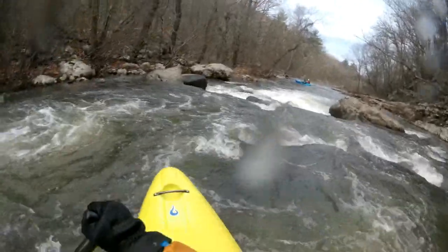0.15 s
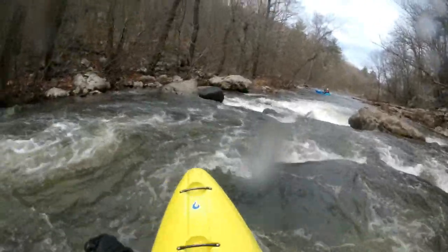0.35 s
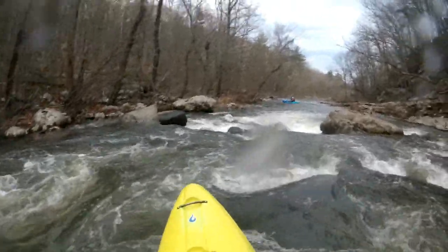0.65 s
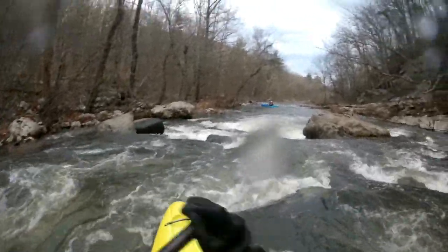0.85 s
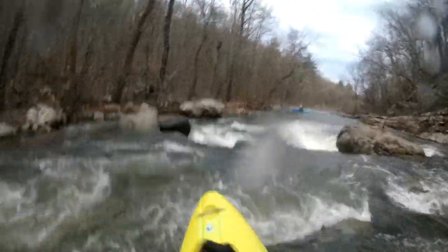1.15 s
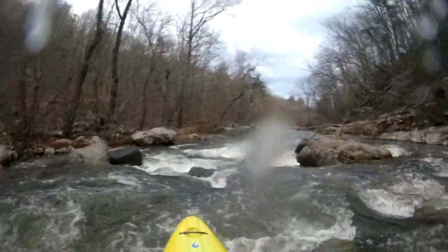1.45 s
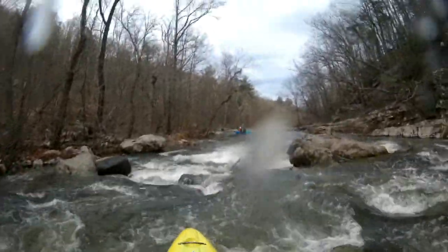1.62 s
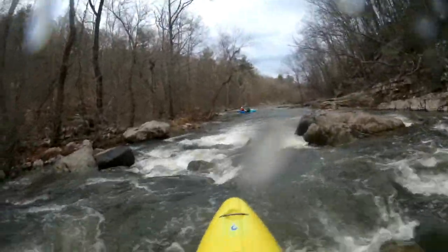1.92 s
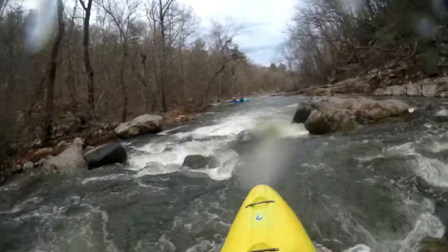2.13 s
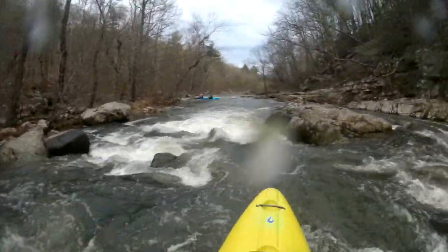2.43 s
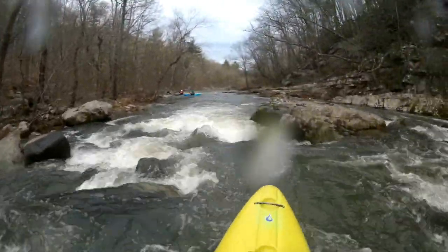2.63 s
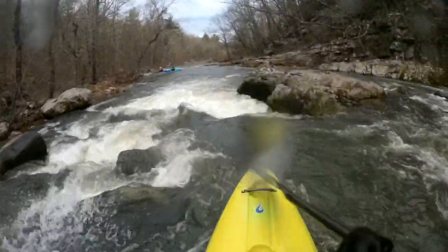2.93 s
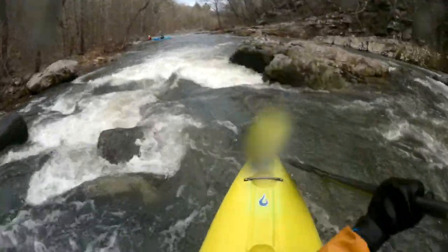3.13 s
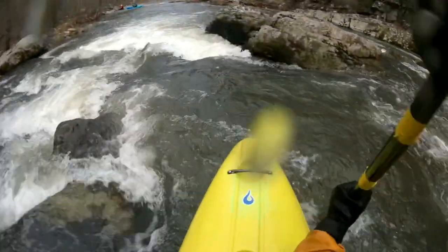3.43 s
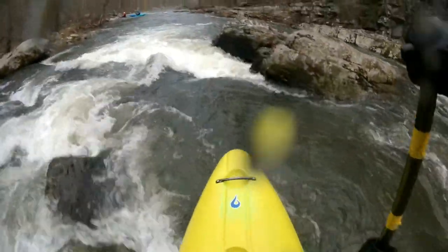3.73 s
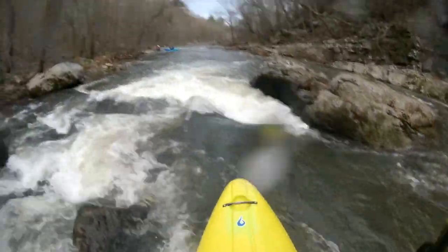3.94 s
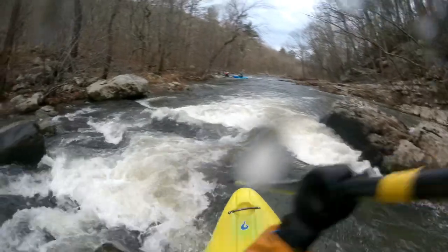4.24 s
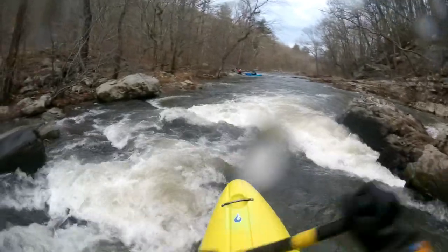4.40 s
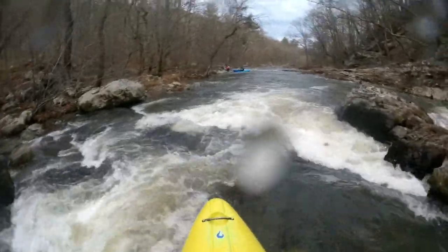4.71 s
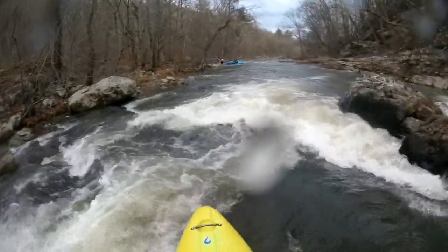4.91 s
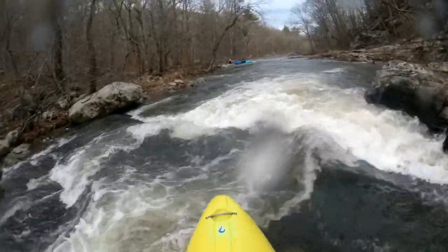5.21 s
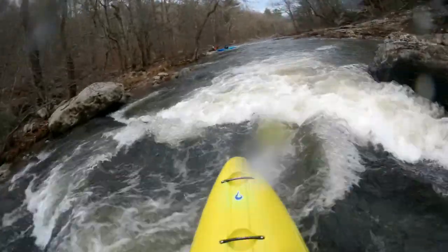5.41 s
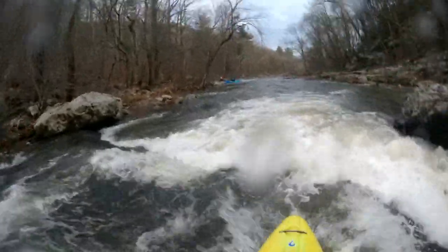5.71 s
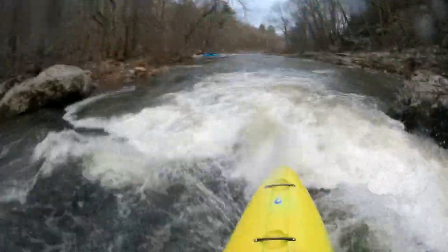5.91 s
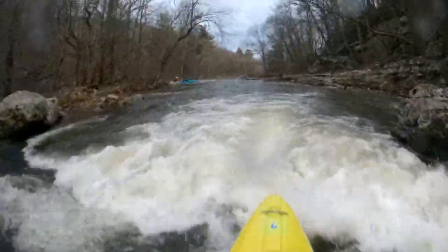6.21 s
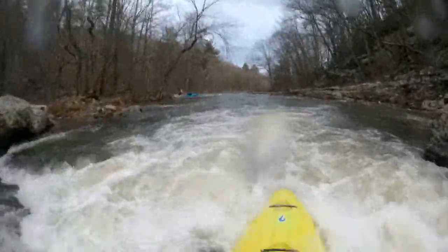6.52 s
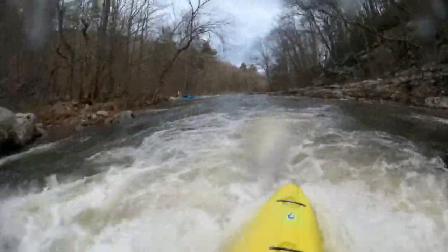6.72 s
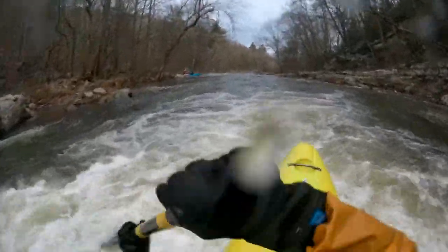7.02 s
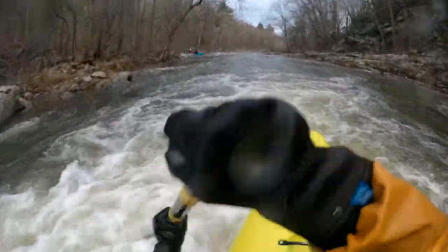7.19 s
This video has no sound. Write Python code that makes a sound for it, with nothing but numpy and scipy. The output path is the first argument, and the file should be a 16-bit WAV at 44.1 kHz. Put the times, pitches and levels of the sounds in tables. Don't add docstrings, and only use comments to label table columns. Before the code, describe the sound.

Continuous creek rapids, heard from a helmet microphone sealed in a plastic case: a boxy midrange roar with low churn, splashy grain, thin foam and faint steady hiss. A few light ticks come from 0.3 to 0.6 s. Between 1 and 1.9 s rough water shakes the helmet: dense sharp plastic clicks, dull knocks, spatter and deep hull thumps, strongest around 1.1 to 1.4. From 2 to 3 it is mostly rushing water. At 3.0 the paddle shaft strikes the hull, a loud, short hollow clunk. Water carries on, with small taps near 4.1 to 4.2, then a hard knock with spray at 4.55 and more clicks until 4.8. From about 5 fine foam fizzes past. At 6 to 6.6 the roar peaks with low thumps, case cracks, droplets and a round watery blup near 6.5. A last tick falls at 7.0 as the rush eases.

```python
import sys
import numpy as np
from scipy import signal
from scipy.fft import rfft, irfft, next_fast_len
from scipy.io import wavfile
from scipy.ndimage import uniform_filter1d, map_coordinates

SR = 44100
rng = np.random.default_rng(int(sys.argv[2]) if len(sys.argv) > 2 else 0)


def digitize_waveform(pressure):
    field = np.atleast_2d(pressure).T
    bounded = np.clip(field, -1, 1)
    quanta = np.round(bounded * 32767).astype(np.int16)
    wavfile.write(sys.argv[1], SR, quanta)


def how_loud(loudness_db):
    steps = np.asarray(loudness_db, float) / 20
    return 10 ** steps


N = 324135

# (frequency [Hz], density [dB/Hz])
HISS = [(2000, -22), (3000, -11), (6500, -4.5), (11000, -11), (14000, -9.5), (15400, -10), (16500, -8)]
# (time [s], roar [dB], whiteness of nearest water [dB])
COURSE = [(0, -48.5, -3), (.49, -47, -3), (.76, -50, -3), (1, -47.5, -4.5), (1.37, -48.5, -6),
          (1.65, -49, 0), (2.03, -47.5, -3.5), (2.5, -47.5, -2), (3.5, -47.5, 0), (4.03, -45.5, 1.5),
          (4.3, -46, -1.5), (4.69, -44, 0.5), (4.9, -45.5, -0.5), (5.65, -45, 0), (6.24, -42, 0),
          (6.65, -42, 1.5), (7.06, -42.5, -0.5), (7.35, -46.5, -3)]
# (frequency [Hz], width [Hz], level [dB])
CAVITY = [(1190, 316, 2), (1597, 250, -4.5), (1840, 217, -6), (2147, 510, -13.5), (2690, 150, -22.5)]
# (frequency [Hz], width [Hz], level [dB])
PORT = [(3460, 990, -0.5), (3980, 1030, 2), (4650, 740, -2.5), (5320, 710, -3), (5800, 430, -6)]
# (frequency [Hz], density [dB/Hz])
FOAM = [(4500, -37), (6000, 1.5), (7000, -1), (8500, 0), (9300, -2.5), (10200, -2), (11200, -4.5),
        (12200, -9), (14500, -10), (16500, -17)]
# (frequency [Hz], density [dB/Hz])
CHURN = [(40, -41), (60, -3), (74, 5.5), (92, 9), (112, 0.5), (160, 2.5), (300, 1), (800, -0.5),
         (1050, -10.5), (2500, -35), (5000, -45)]
# (time [s], half length [s], level [dB], pitch [Hz])
CRESTS = [
    (3.45, 0.41, -89, 9200),
    (4.1, 1, -74.5, 8500),
    (4.2, .75, -77, 9300),
    (5.397, 0.66, -68, 5100),
    (6.4, 0.64, -73, 7100),
    (6.4, 0.61, -71, 9200),
]
# (frequency [x pitch], width [x pitch], level [dB])
FIZZ = [(.98, .09, 3), (1.2, .12, 0)]
# (time [s], half length [s], bob [dB], judder [dB])
JOLTS = [(0.298, 0.17, -30, -55), (0.18, 0.016, -42, -47), (0.43, 0.075, -44, -42.5),
         (0.635, 0.048, -29.5, -52), (1.017, 0.052, -27.5, -37.5), (1.105, 0.029, -19, -34),
         (1.26, 0.12, -20.5, -45), (1.4, 0.069, -39, -44), (1.712, 0.18, -29, -52),
         (1.974, 0.1, -36.5, -47), (2.31, 0.076, -32.5, -51), (2.65, 0.086, -39, -55),
         (3.084, 0.15, -41.5, -50), (3.548, 0.3, -41, -48.5), (3.937, 0.014, -29, -52),
         (4.257, 0.14, -34, -53), (4.648, 0.12, -30, -46), (4.902, 0.066, -35.5, -53),
         (5.094, 0.065, -39.5, -57), (5.393, 0.26, -44, -61), (5.613, 0.045, -35, -59),
         (5.796, 0.082, -30, -46), (6.013, 0.088, -24.5, -53), (6.166, 0.049, -30.5, -41),
         (6.373, 0.09, -21.5, -41), (6.566, 0.047, -30, -41.5), (6.687, 0.048, -32.5, -46),
         (6.95, 0.12, -34, -46), (7.2, 0.16, -47, -54)]
# (frequency [Hz], density [dB/Hz])
BOB = [(2, -14), (5, -4.5), (10, 3.5), (14, -6.5), (20, -17.5), (28, -45)]
# (frequency [Hz], density [dB/Hz])
JUDDER = [(14, -13), (22, 2.5), (31, -9), (45, -4), (62, -20), (90, -22), (200, -44)]
# (time [s], peak [dB], pitch [Hz])
SLAPS = [(0.3, -46.5, 104), (0.616, -45.5, 96), (0.697, -41.5, 90), (1.005, -34.5, 55), (1.086, -26, 30),
         (1.285, -35, 45), (1.685, -34, 36), (1.81, -43, 62.3), (1.87, -51, 149), (1.661, -47, 98),
         (2.116, -46, 92), (3.01, -42, 75), (3.208, -36, 90), (3.666, -43, 87), (4.619, -50, 83),
         (4.3, -48, 90), (5.23, -42.5, 62), (5.32, -50.5, 130), (5.6, -48, 69.6), (5.895, -34, 48),
         (5.94, -41, 66), (5.99, -48, 139), (6.125, -36, 30), (6.365, -39, 80), (6.618, -52, 110),
         (6.769, -48.5, 87), (6.933, -43, 96.5), (7.12, -43, 58)]
# (time [s], peak [dB])
PADDLE = [
    (3.0103, -13),
    (3.017, -27),
]
# (frequency [Hz], width [Hz], level [dB])
SHAFT = [(110, 72, -7.5), (206, 70, 1), (396, 85, -11), (730, 230, -11.5), (1180, 135, 0), (1375, 160, 2.5),
         (1850, 285, -0.5), (2420, 180, -17), (2820, 190, -17.5)]
# (time [s], peak [dB], pitch [Hz], ring [ms])
BLUPS = [
    (5.975, -40, 600, 7.2),
    (6.468, -21.5, 1170, 9.4),
    (6.478, -32, 1317, 10),
    (3.066, -39, 197, 22),
    (3.082, -37, 505, 27),
    (5.27, -34.5, 1140, 7.1),
]
# (time [s], peak [dB], pitch [Hz])
FLECKS = [(0.2753, -44, 5500), (.2765, -49, 9500), (.3615, -43, 6000), (.461, -47, 7000),
          (.465, -49, 10500), (.617, -39, 4000), (.618, -52, 8500), (1.022, -52, 6500), (1.0665, -36, 3500),
          (1.0795, -38, 6200), (1.082, -39, 10000), (1.0915, -47, 5600), (1.104, -37, 4200),
          (1.1095, -40, 5800), (1.143, -47, 6000), (1.181, -38, 4000), (1.192, -32, 4000),
          (1.207, -56, 8700), (1.267, -33, 5000), (1.273, -42, 6000), (1.283, -48, 4000),
          (1.329, -40, 6000), (1.343, -46, 12000), (1.345, -49, 9000), (1.380, -44, 4000),
          (1.4135, -42, 6000), (1.546, -48, 5500), (1.550, -50, 9500), (1.648, -44, 5500),
          (1.656, -48, 8000), (1.660, -46, 7000), (1.698, -42, 4000), (1.749, -51, 11000),
          (1.753, -50, 9000), (1.781, -47, 5000), (1.8415, -44, 11500), (1.855, -42, 6000),
          (3.009, -39, 4600), (4.545, -30, 2500), (4.547, -36, 4500), (4.552, -36, 2380),
          (4.634, -44, 3500), (4.705, -40, 8000), (4.777, -42, 6000), (4.928, -48, 7500),
          (5.744, -40.5, 5700), (5.746, -49, 10500), (5.823, -48, 9000), (6.017, -37, 4500),
          (6.028, -36, 4500), (6.104, -38, 8500), (6.328, -43, 10000), (6.383, -44, 10000),
          (6.433, -35, 4000), (6.467, -38, 4700), (6.594, -38, 6000), (1.1005, -39, 643),
          (1.2645, -40, 600), (1.652, -44, 700), (4.544, -35, 910)]
# (time [s], peak [dB], pitch [Hz])
MORE_FLECKS = [(.6095, -46, 14500), (1.0995, -44, 14500), (1.134, -42, 15000), (1.263, -39, 14800),
               (1.267, -44, 14800), (1.604, -52, 13000), (1.6935, -47, 14800), (1.697, -53, 15000),
               (1.7765, -46, 15000), (1.782, -49, 15000), (1.651, -52, 13500), (6.090, -50, 15000),
               (6.105, -48, 15000), (6.294, -50, 14500), (6.328, -47, 14000), (6.380, -43, 15000),
               (1.0995, -38, 2300), (1.189, -40, 2800), (1.6928, -35, 3200), (1.7762, -37, 3000),
               (1.3332, -30.5, 3260), (4.2275, -33, 2970), (6.2195, -33.5, 2000), (5.8, -34, 2500),
               (7.006, -42, 3500), (1.651, -34, 5100), (0.91, -34, 5400), (6.0945, -22.5, 5350),
               (.6097, -35, 6000), (1.1895, -34, 7500), (4.763, -41, 7200), (1.410, -27, 7900),
               (1.0742, -28, 10500), (6.0945, -27, 9500), (6.0948, -32, 6000), (4.6, -52, 9700),
               (4.0848, -54, 12000), (4.7635, -55, 11000), (5.4, -45, 7000), (6.3795, -40, 6700),
               (4.7008, -29, 8700), (4.546, -31, 1120), (3.024, -34, 1500), (1.5, -49, 11600), (1.66, -49, 11500),
               (4.108, -50, 8000), (6.180, -36, 4800)]
# (time [s], peak [dB], pitch [Hz], thud re peak [dB])
KNOCKS = [(0.3662, -34, 1180, -14), (0.611, -31.5, 1020, -8), (1.0746, -30, 1540, -6),
          (1.1, -28, 1160, -6.5), (1.127, -36, 1490, -10), (1.1344, -26, 1330, -19),
          (1.264, -29, 1570, -4.5), (1.3337, -25, 1590, -26), (1.3718, -30.5, 1100, -22),
          (1.404, -28.5, 1150, -12), (1.651, -34.5, 1240, -18), (1.693, -32.5, 1090, -18),
          (1.776, -31, 1630, -18), (3.0695, -33.5, 1160, -2), (4.0858, -38, 1290, -28),
          (4.229, -33, 1200, -21), (4.5436, -22.5, 2000, -26), (4.5498, -22.5, 1770, -15.5),
          (4.6628, -34, 1870, -11), (4.696, -30.5, 1560, -25), (5.9803, -33, 1190, 1.5),
          (6.0142, -29.5, 1190, -5), (6.097, -33, 1310, -9), (6.18, -30.5, 1590, -13),
          (6.2923, -41, 1120, -5), (6.38, -30, 1090, -22)]
# (time [s], ring peak [dB], crackle [dB], scrape [ms])
TAPS = [(0.2807, -31.5, -55, 1.5), (.367, -20.5, -45, 1.5), (0.6095, -23.5, -31.5, 1.5),
        (1.0739, -19, -22, 1.35), (1.0994, -18, -31, 1.2), (1.1343, -8, -37, 0.92), (1.263, -15, -32, 2.3),
        (1.3329, -9, -32, 1.2), (1.3723, -26, -66, 1.6), (1.41, -17.5, -24.5, 1.1), (1.5515, -27, -49, 1),
        (1.6509, -19, -43, 1.2), (1.6923, -24, -48, 1.1), (2.3196, -36, -45, 0.95), (3.008, -36, -69, 1.3),
        (4.0845, -22, -45, 0.84), (4.2274, -26, -42, 1.4), (4.663, -24, -39, 1.2), (4.6958, -22, -29, 1.1),
        (4.7012, -21, -21.5, 1.7), (4.763, -24, -34, 1), (5.7755, -32.5, -63, 1.1),
        (5.828, -23.5, -49, 0.93), (6.0944, -14.5, -21.5, 1.2), (6.1795, -31.5, -36, 1.4),
        (6.219, -24.5, -60, 1.2), (6.2933, -25.5, -44, 1.4), (6.3795, -13, -40, 0.77),
        (6.701, -31, -40, 1.3), (7.005, -24.5, -34, 1.2)]
# (time [s], ring peak [dB], crackle [dB], scrape [ms])
SCUFFS = [(1.063, -32, -67, 2.8), (1.090, -40, -73, 2.1), (1.108, -31, -50, 1.4), (1.129, -33, -36, 1.2),
          (1.133, -39, -35.5, 1.8), (1.271, -31, -50, 2.1), (1.329, -41, -58, 3.1), (1.340, -54, -60, 3.4),
          (1.403, -30, -45, 2.8), (4.547, -42, -47, 5.6), (4.706, -45, -51, 1.2), (6.097, -32, -59, 3),
          (6.371, -35, -57, 7.2)]
# (time [s], ring peak [dB], crackle [dB], scrape [ms])
MORE_TAPS = [(.4693, -37.5, -53, 1.6), (.6724, -50, -46, 1.3), (.7957, -50, -48, 1.6), (1.189, -29, -34, 2.6),
             (1.503, -47, -73, 1.3), (1.603, -43, -50, 1.3), (1.7436, -45, -44, 1.5), (1.7756, -23, -48, 1.3),
             (1.8437, -37, -41.5, 1.8), (1.8602, -34.5, -53, 3), (1.866, -37.5, -57, 1.4),
             (1.977, -52, -46, 2.3), (2.0517, -48, -44.5, 1.9), (2.663, -35, -49, 2.3),
             (3.328, -39.5, -45.5, 4), (4.1784, -41, -64, 1.3), (4.5428, -23.5, -28, 2.4),
             (4.556, -36, -52, 1.3), (4.5806, -38, -57, 1.6), (4.6574, -50, -45, 1.4),
             (5.9757, -41, -37.5, 2.9), (5.9873, -32, -37, 1.2), (6.011, -30, -37, 2.8),
             (6.3232, -32, -36, 2.1), (6.4287, -28, -34, 2), (6.595, -46, -40, 1.3), (6.9092, -41, -43, 1.3)]
# (frequency [Hz], width [Hz], level [dB])
TAPPED_PORT = [(2090, 1160, -19), (3360, 610, -10), (4000, 580, 1), (4500, 820, -4), (5100, 540, -12),
               (5950, 430, -11.5)]
# (frequency [Hz], density [dB/Hz])
CRACKLE = [(900, -102), (3500, 7), (5600, 10), (7100, 0.5), (9600, 2), (11000, 3), (12500, -2.5),
           (14000, -12), (15300, -7), (16500, -2)]
# (from [s], to [s], low [Hz], high [Hz])
DROPOUTS = [(.348, .358, 2600, 7200), (.479, .485, 9500, 16500), (.602, .606, 5500, 16500),
            (.622, .627, 5500, 16500), (1.058, 1.068, 8300, 16500), (1.086, 1.097, 9000, 16500),
            (1.086, 1.089, 2800, 9000), (1.1155, 1.1245, 2700, 16500), (1.143, 1.160, 9300, 16500),
            (1.146, 1.159, 2800, 7000), (1.197, 1.203, 4500, 16500), (1.202, 1.206, 3000, 4500),
            (1.251, 1.260, 8800, 16500), (1.254, 1.2595, 2800, 8800), (1.315, 1.326, 3300, 8300),
            (1.316, 1.328, 9000, 16500), (1.3935, 1.399, 4300, 16500), (1.535, 1.545, 3500, 4800),
            (1.613, 1.622, 10500, 12500), (1.664, 1.672, 14000, 16500), (1.663, 1.667, 2800, 5500),
            (1.685, 1.690, 11500, 12800), (1.709, 1.714, 3000, 4700), (1.758, 1.773, 12500, 16500),
            (1.766, 1.773, 3000, 6500), (1.826, 1.839, 10000, 16500), (4.528, 4.5375, 6200, 16500),
            (4.689, 4.695, 9000, 14500), (4.687, 4.694, 7000, 7800), (6.083, 6.0905, 6500, 12500),
            (6.187, 6.190, 11500, 16500), (6.988, 6.993, 9000, 16500), (6.298, 6.303, 13500, 16500),
            (6.366, 6.375, 13800, 16500), (6.392, 6.399, 13500, 16500), (4.092, 4.099, 13000, 14000)]
# (frequency [Hz], gain [dB])
BAND = [(0, 0), (15700, 0), (15800, -34), (16450, -36), (16550, -80), (22050, -80)]


def unit(x):
    return x / np.sqrt(np.mean(x ** 2) + 1e-20)


def curves(rows):
    time_s, *cols = np.transpose(rows)
    return [np.interp(np.arange(N) / SR, time_s, c) for c in cols]


def wobble(rate_hz):
    knots = rng.standard_normal(int(N * rate_hz / SR) + 4)
    return map_coordinates(knots, [np.arange(N) * rate_hz / SR])


def filtered(x, response):
    m = next_fast_len(x.shape[-1] + 8192)
    return irfft(rfft(x, m) * response(np.fft.rfftfreq(m, 1 / SR)), m)[..., :x.shape[-1]]


def colour(points):
    f, db = np.transpose(points)
    return lambda hz: how_loud(np.interp(np.log(hz + 1), np.log(f + 1), db, left=-120, right=-120))


def modes(table):
    def power(f, hz, width_hz, db):
        detune = (hz * hz - f * f) / (f * width_hz + 1e-9)
        return how_loud(2 * db) / (1 + detune ** 2) ** 2
    return lambda f: np.sqrt(sum(power(f, *row) for row in table))


def causal(gain):
    cep = irfft(np.log(gain + 1e-5))
    half = cep.shape[-1] // 2
    fold = np.r_[1, np.full(half - 1, 2.), 1, np.zeros(half - 1)]
    return np.exp(rfft(cep * fold))


def contacts(times_s, scrape_ms, response, peaks_db, sharp, count):
    t = np.arange(count) / SR - .006
    blow_s = .0012
    fade = 1000 * (t - blow_s) / np.clip(scrape_ms, .2, 15)[:, None]
    creep = 0.33 * np.exp(-1.2 * np.abs(fade))
    push = rng.standard_normal(fade.shape) * np.where(fade > 0, np.exp(-np.abs(fade)), creep)
    push += sharp * np.exp(-.5 * ((t - blow_s) / .00003) ** 2)
    hz = np.fft.rfftfreq(2 * count, 1 / SR)
    hits = irfft(rfft(push, 2 * count) * causal(response(hz)))[:, :count]
    hits *= np.cos(np.pi / 2 * np.arange(count) / count)
    hits *= (how_loud(peaks_db) / np.abs(hits).max(axis=1))[:, None]
    where = np.round((times_s + t[0]) * SR).astype(int)[:, None] + np.arange(count)
    return np.bincount(where.ravel(), hits.ravel(), N + SR)[:N]


def hiss():
    return how_loud(-73.0) * unit(filtered(rng.standard_normal(N), colour(HISS)))


def water(response, patchy_db, surge_db, drops_db, drops_per_s):
    z = signal.stft(rng.standard_normal(N + 512), nperseg=512)[2]
    field = uniform_filter1d(rng.standard_normal(z.shape), size=5, axis=0)
    field = uniform_filter1d(field, size=8, axis=1)
    rush = signal.istft(z * how_loud(patchy_db * unit(field)), nperseg=512)[1][:N]
    size = rng.standard_normal(N) * how_loud(3.2 * np.minimum(rng.exponential(size=N), 2.5))
    drops = unit((rng.random(N) < drops_per_s / SR) * size)
    mix = unit(rush) + how_loud(drops_db) * drops
    return unit(filtered(mix * how_loud(surge_db * wobble(14)), response))


def jolts():
    t = np.arange(0, N, 64) / SR
    time_s, half_s, bob_db, judder_db = np.transpose(JOLTS)
    swell = np.exp(-((t - time_s[:, None]) / half_s[:, None]) ** 2)
    bob = how_loud(-50) + how_loud(bob_db) @ swell
    judder = how_loud(-57.5) + how_loud(judder_db) @ swell
    return [np.interp(np.arange(N) / SR, t, r) for r in (bob, judder)]


def rapids():
    roar_db, white_db = curves(COURSE)
    splash_db = roar_db - 12.5 + white_db
    foam_db = roar_db - 22 + 1.3 * white_db
    roar = how_loud(roar_db - .2) * water(modes(CAVITY), patchy_db=1.6, surge_db=.8, drops_db=-10, drops_per_s=1200)
    splash = how_loud(splash_db) * water(modes(PORT), patchy_db=1.6, surge_db=.7, drops_db=-11, drops_per_s=700)
    foam = how_loud(foam_db) * water(colour(FOAM), patchy_db=1.8, surge_db=.9, drops_db=-11, drops_per_s=700)
    stirred = how_loud(roar_db - 9) + how_loud(-34) * jolts()[0]
    churn = stirred * water(colour(CHURN), patchy_db=2.0, surge_db=0.44, drops_db=-8.5, drops_per_s=400)
    return how_loud(.6 * wobble(6)) * (roar + churn + splash + foam)


def crest():
    total = np.zeros(N)
    for time_s, half_s, db, pitch_hz in CRESTS:
        near = np.exp(-((np.arange(N) / SR - time_s) / half_s) ** 4 + .14 * wobble(4.1))
        bands = [(c * pitch_hz, w * pitch_hz, level_db) for c, w, level_db in FIZZ]
        total += how_loud(db) * near * unit(filtered(rng.standard_normal(N), modes(bands)))
    return total


def steady(x, window_s):
    return x / np.sqrt(np.abs(uniform_filter1d(x ** 2, int(window_s * SR))) + 0.3)


def helmet():
    bob_size, judder_size = jolts()
    bob = unit(filtered(rng.standard_normal(N), colour(BOB)))
    judder = unit(filtered(rng.standard_normal(N), colour(JUDDER)))
    return bob_size * steady(bob, 0.093) + judder_size * steady(judder, 0.117)


def hull():
    time_s, db, hz = np.transpose(SLAPS)[..., None]
    rise_s, t60_s = 0.0092, 0.19
    t = np.arange(N)[::8] / SR - time_s
    decay = how_loud(db + 4.0 - 60 * np.abs(t) / t60_s)
    rise = 1 - np.exp(-(np.clip(t, 0, 1) / rise_s) ** 2)
    boom = decay * rise * np.sin(2 * np.pi * hz * t)
    return signal.resample_poly(boom.sum(0), 8, 1)[:N]


def paddle():
    time_s, db = np.transpose(PADDLE)
    return contacts(time_s - .0012, np.full(len(time_s), .8), modes(SHAFT), db, sharp=12, count=2048)


def blups():
    time_s, db, hz, ring_ms = np.transpose(BLUPS)[..., None]
    width_hz = 550 / ring_ms
    pocket = modes([(hz, width_hz, 0), (1.17 * hz, width_hz, -5), (hz, 500, -17)])
    splat_ms = np.full(len(time_s), 1.5)
    return contacts(time_s[:, 0] - .0015, splat_ms, pocket, db[:, 0] - .8, sharp=3.1, count=4096)


def flecks():
    time_s, db, hz = np.transpose(FLECKS + MORE_FLECKS)
    width_hz = 0.41 * np.minimum(hz, 7000)
    band = modes([(hz[:, None], width_hz[:, None], 0)])
    return contacts(time_s - .0012, np.full(len(time_s), 1.7), band, db, sharp=1.1, count=1024)


def knocks():
    time_s, db, hz, thud_db = np.transpose(KNOCKS)
    blow_ms, thud_hz = np.full(len(time_s), 5.4), 174
    pitch = modes([(hz[:, None], 1100, 0)])
    near = lambda f: (modes(CAVITY)(f) + 2.7 / (1 + (f / 2600) ** 4)) * pitch(f)
    dull = modes([(thud_hz, 110, 0), (0.77 * thud_hz, 130, -4), (650, 600, -12)])
    ring = contacts(time_s - .0008, blow_ms, near, db - 0.5, sharp=2.84, count=2048)
    thud = contacts(time_s - .0008, 3.0 * blow_ms, dull, db + thud_db - .8, sharp=10.4, count=2048)
    return ring + thud


def struck(time_s, ring_db, crackle_db, scrape_ms, wall_hz):
    wall = modes([(wall_hz, 5000, 0)])
    spot = lambda f: colour(CRACKLE)(f) * (1.0 + wall(f))
    ring = contacts(time_s, scrape_ms, modes(TAPPED_PORT), ring_db - .8, sharp=2.3, count=2048)
    crackle = contacts(time_s, 0.76 * scrape_ms, spot, crackle_db + 4.0, sharp=2.34, count=2048)
    return ring + crackle


def scuffs():
    time_s, ring_db, crackle_db, scrape_ms = np.transpose(SCUFFS)
    ring = contacts(time_s, scrape_ms, modes(TAPPED_PORT), ring_db - .8, sharp=0, count=2048)
    return ring + contacts(time_s, scrape_ms, colour(CRACKLE), crackle_db + 10.0, sharp=0, count=2048)


def ticks():
    taps = struck(*np.transpose(TAPS), wall_hz=7100)
    more_taps = struck(*np.transpose(MORE_TAPS), wall_hz=7160)
    return taps + more_taps + scuffs()


def scene():
    background = hiss() + rapids() + crest()
    motion = helmet() + hull() + paddle()
    case = blups() + flecks() + knocks() + ticks()
    return (background + motion + case)[None]


def dropouts(x):
    hz, t, z = signal.stft(x, SR, nperseg=128, noverlap=96)
    keep = np.ones(z.shape[-2:])
    luck = np.repeat(rng.random((len(DROPOUTS), 33)), 2, axis=1)[:, :len(hz)]
    for (start_s, end_s, low_hz, high_hz), chance in zip(DROPOUTS, luck):
        silent = (hz > low_hz) & (hz < high_hz) & (chance > .07)
        keep[np.ix_(silent, (t > start_s) & (t < end_s))] = how_loud(-35)
    return signal.istft(z * keep, SR, nperseg=128, noverlap=96)[1][..., :N]


def band_limit(x):
    return signal.sosfilt(signal.butter(12, 16920, fs=SR, output="sos"), x)


def record(dry):
    limited = filtered(dropouts(dry), colour(BAND))
    return band_limit(limited + .0063)


dry = scene()
out = record(dry)
digitize_waveform(out)
```